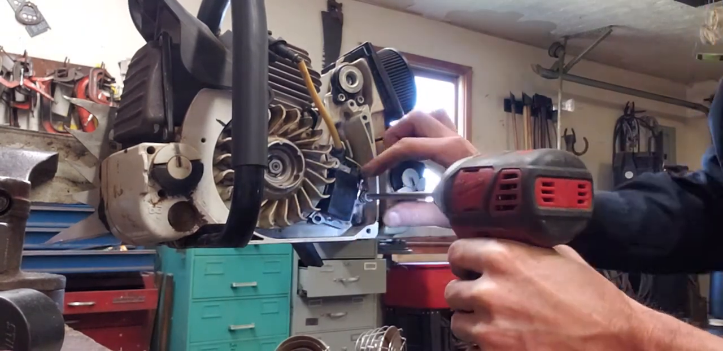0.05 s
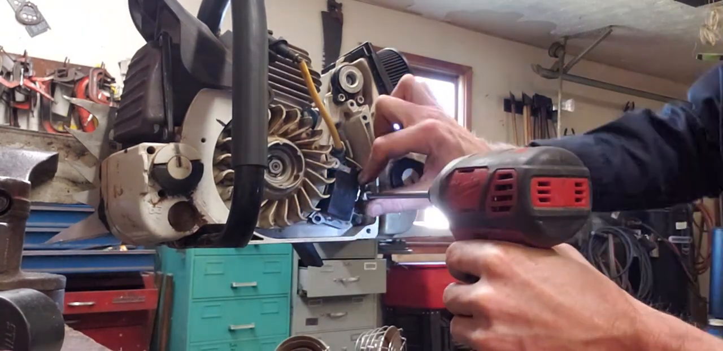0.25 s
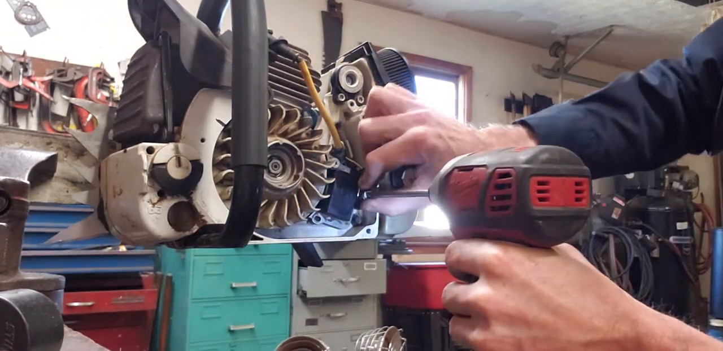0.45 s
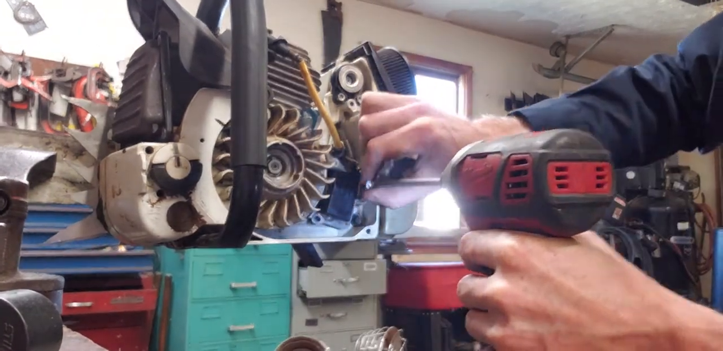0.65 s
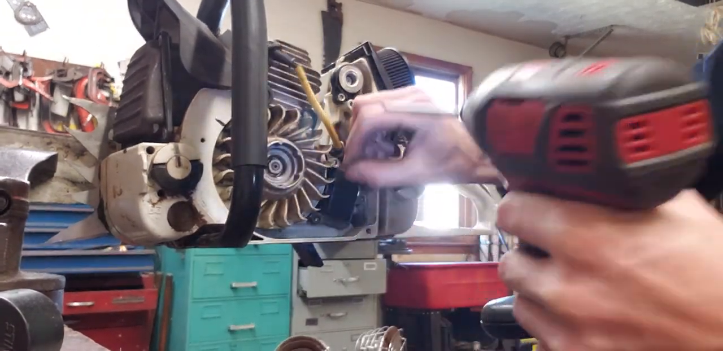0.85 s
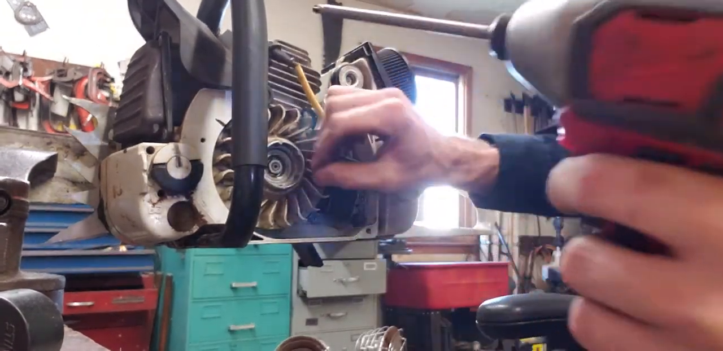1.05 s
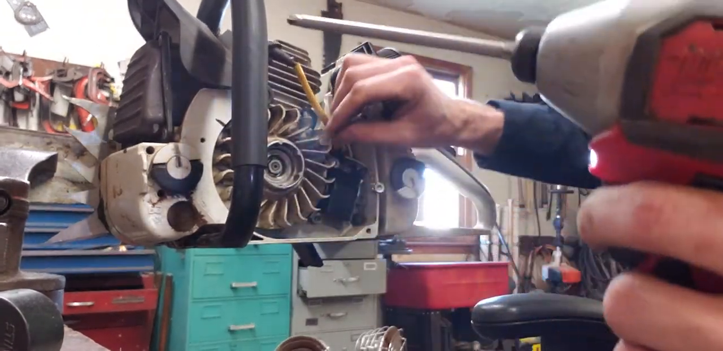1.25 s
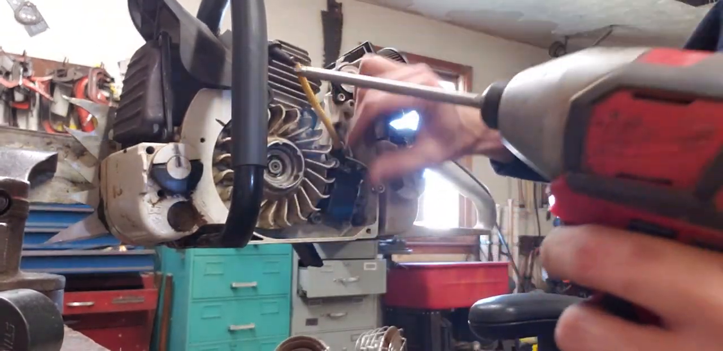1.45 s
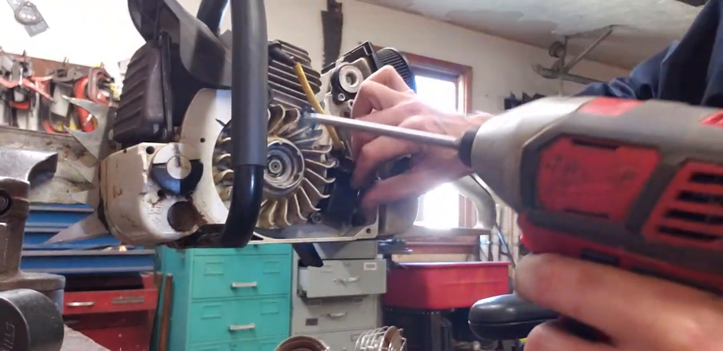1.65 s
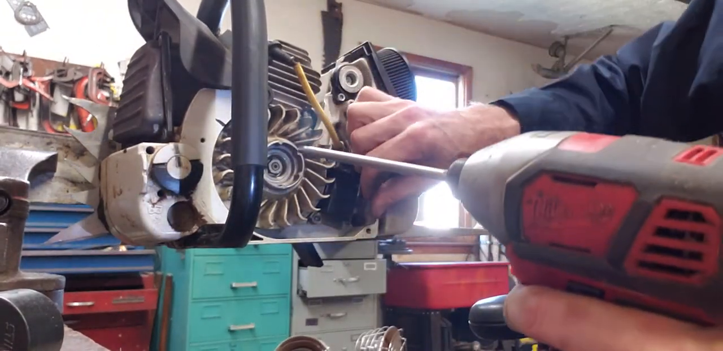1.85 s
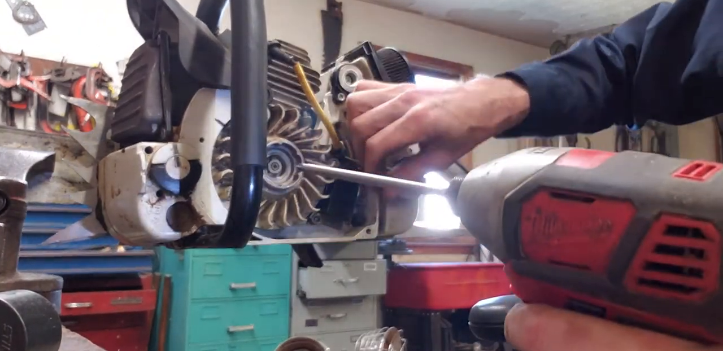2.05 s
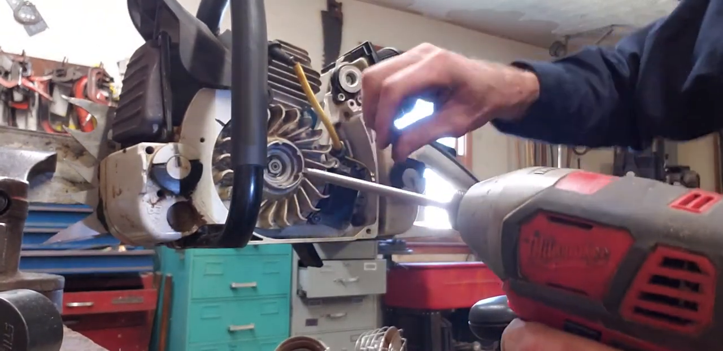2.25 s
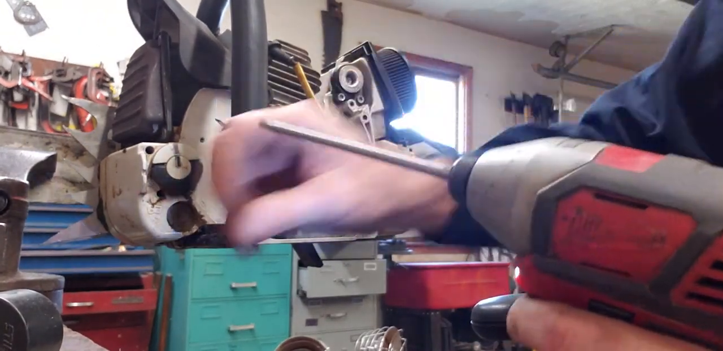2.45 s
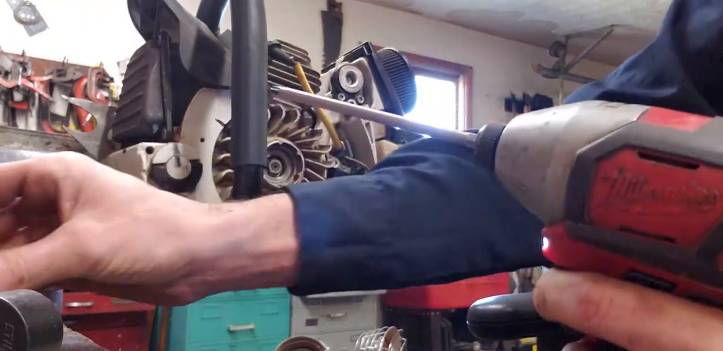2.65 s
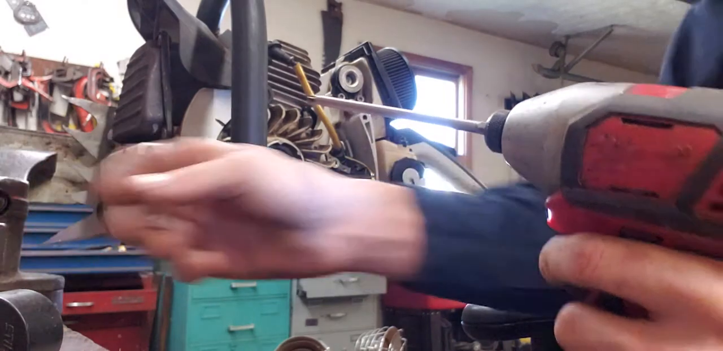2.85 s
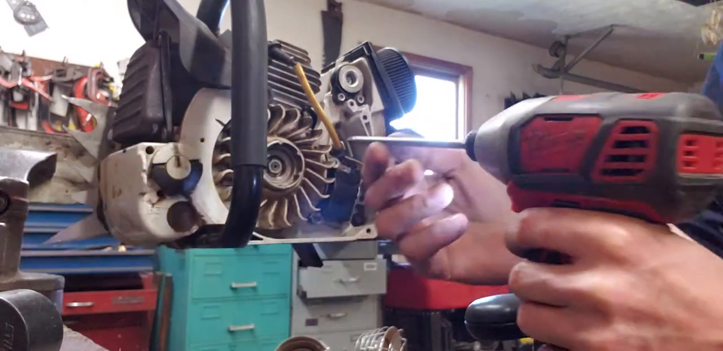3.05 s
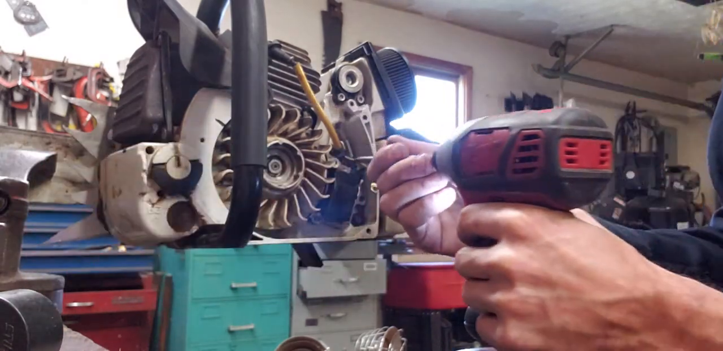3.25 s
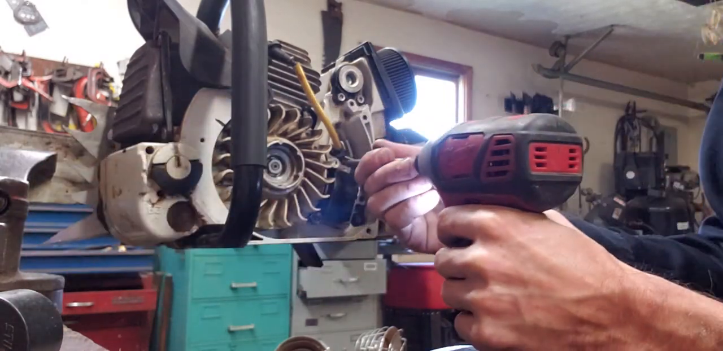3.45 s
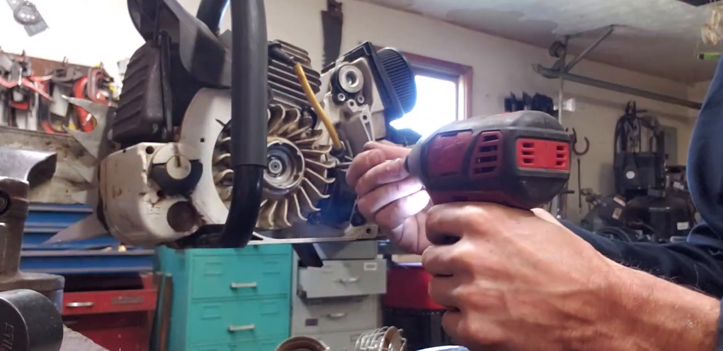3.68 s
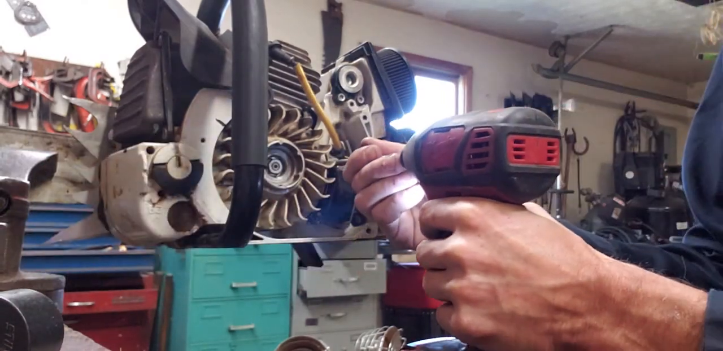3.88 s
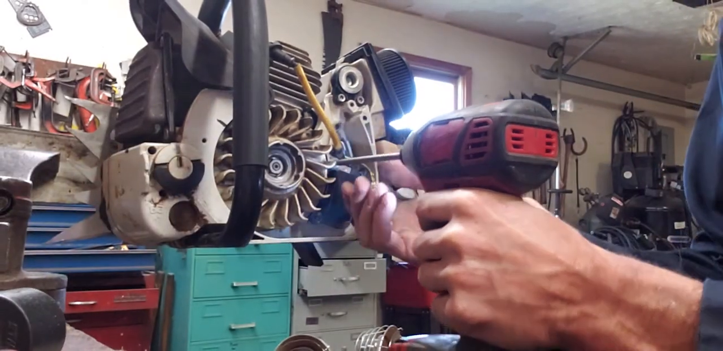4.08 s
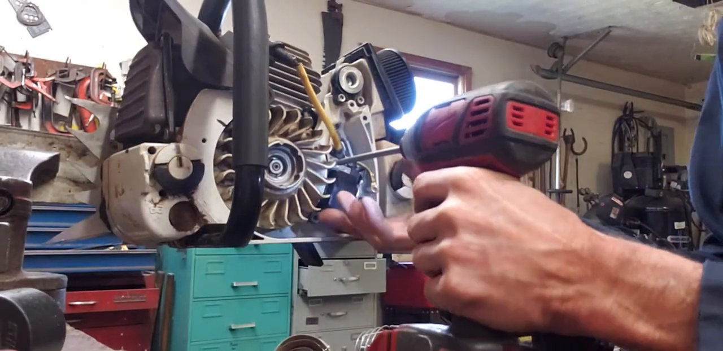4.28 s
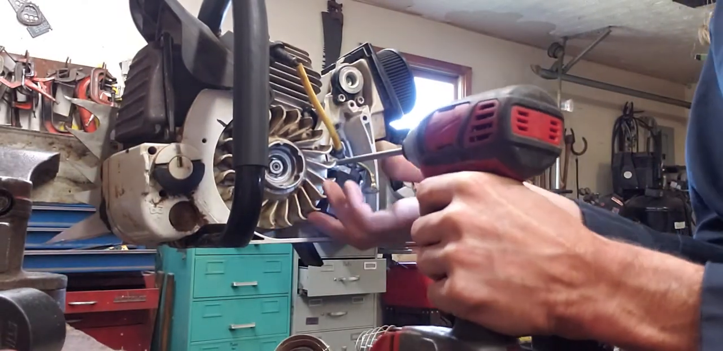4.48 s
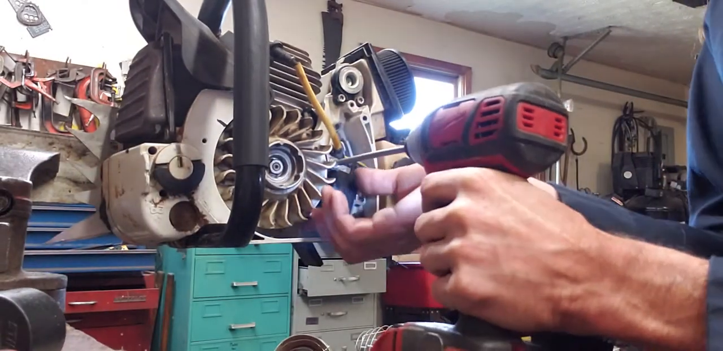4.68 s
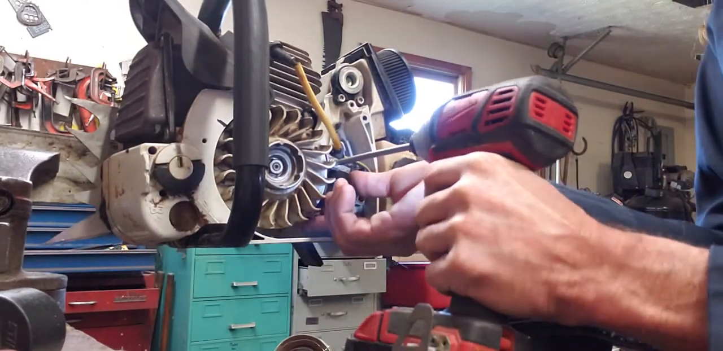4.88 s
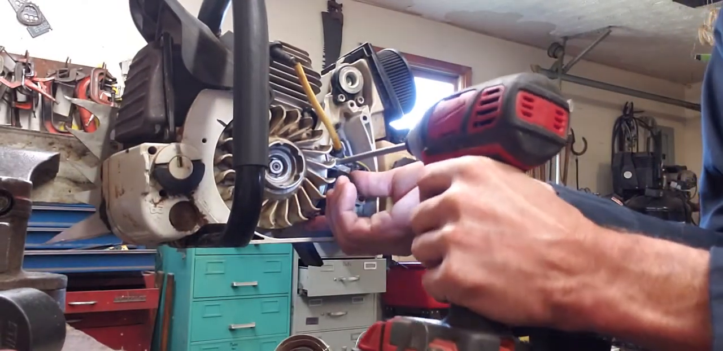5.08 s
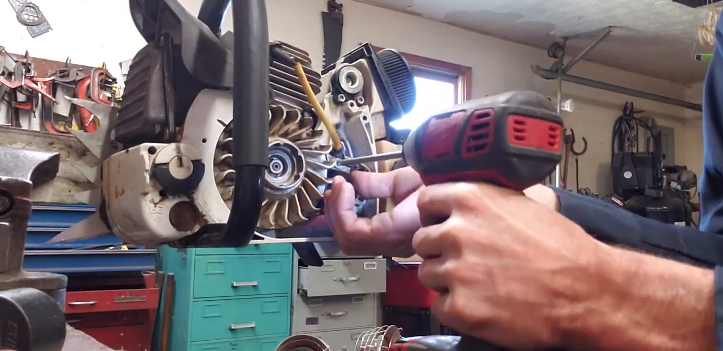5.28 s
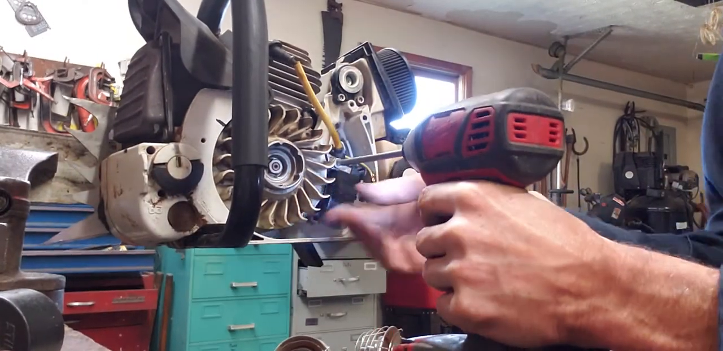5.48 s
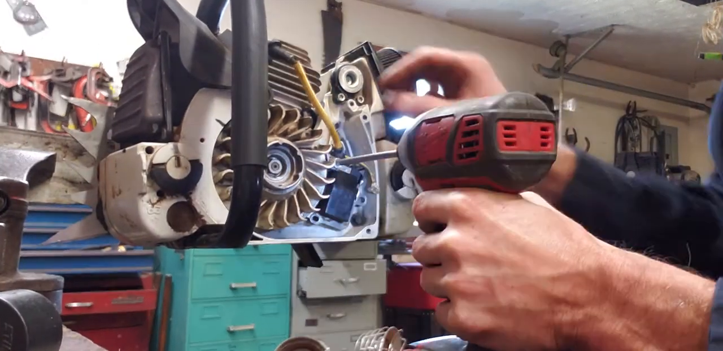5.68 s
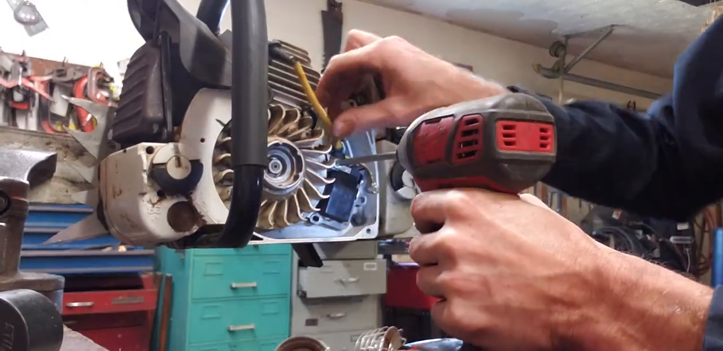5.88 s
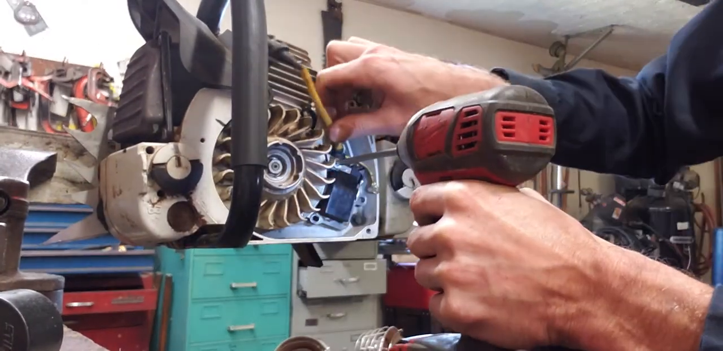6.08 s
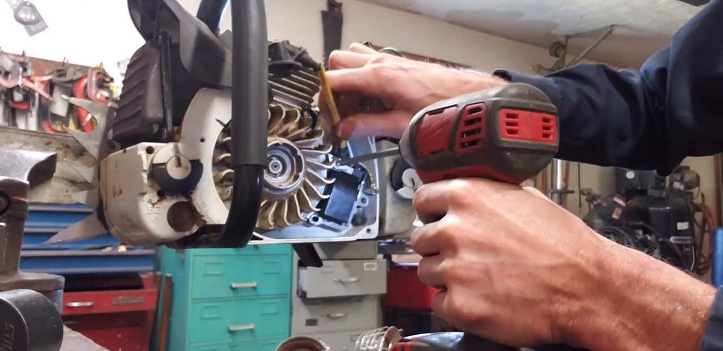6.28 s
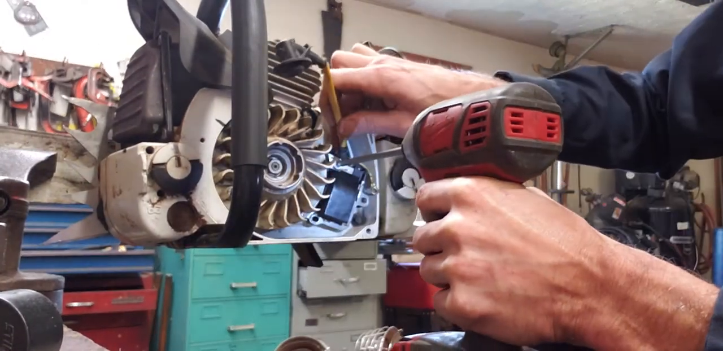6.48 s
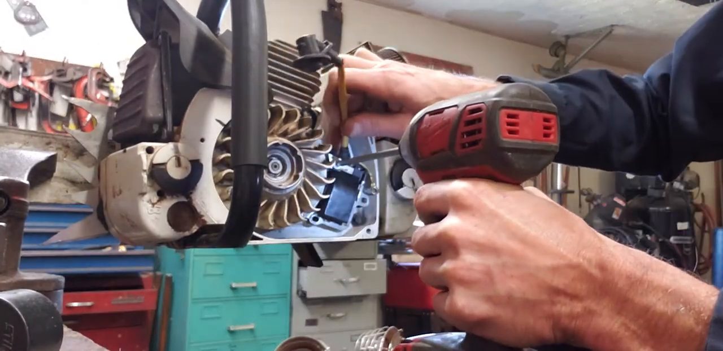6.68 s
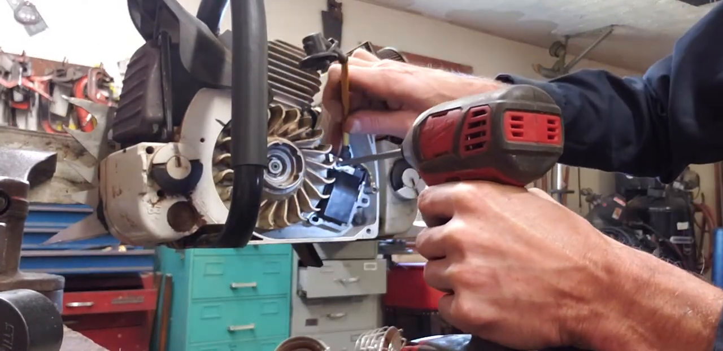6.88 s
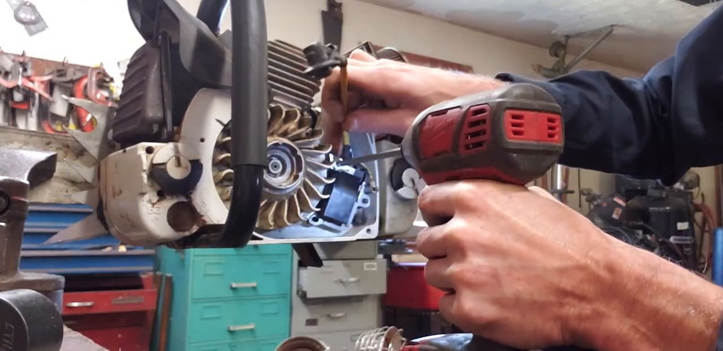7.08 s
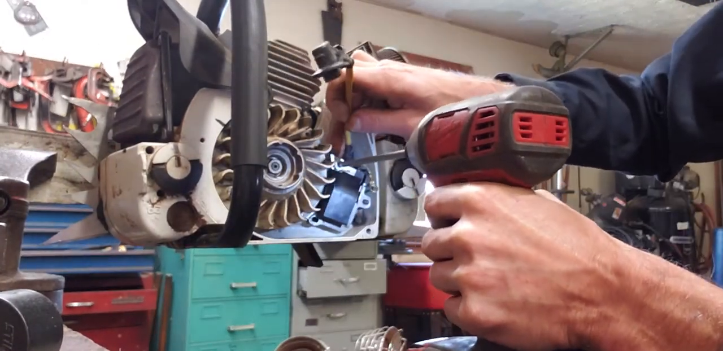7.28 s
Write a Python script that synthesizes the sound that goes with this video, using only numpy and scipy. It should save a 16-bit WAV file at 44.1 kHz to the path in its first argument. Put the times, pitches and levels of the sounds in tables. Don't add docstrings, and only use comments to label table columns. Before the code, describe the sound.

In an echoing workshop, loose screws click on an engine casting, a part drops, and a cordless driver rattles twice, whines down, then turns slowly.

```python
import sys
import numpy as np
from scipy import signal
from scipy.fft import rfft, irfft, next_fast_len
from scipy.io import wavfile
from scipy.ndimage import uniform_filter1d

SR = 44100
rng = np.random.default_rng(int(sys.argv[2]) if len(sys.argv) > 2 else 0)


def convert_level_to_amplitude(level_db):
    exponent = np.asarray(level_db, float) / 20
    return 10 ** exponent


def file_out(sig):
    cols = np.atleast_2d(sig).T
    lim = np.clip(cols, -1, 1)
    pcm = np.round(lim * 32767).astype(np.int16)
    wavfile.write(sys.argv[1], SR, pcm)


N = 323253
T = np.arange(N) / SR
LONG = next_fast_len(N + SR, True)
HZ = np.maximum(np.fft.rfftfreq(LONG, 1 / SR), 1)


def along_hz(table):
    hz, value = np.transpose(table)
    return np.interp(np.log(HZ), np.log(hz), value)


def band(colour, lo_hz, hi_hz):
    edges = np.sqrt((1 + (lo_hz / HZ) ** 8) * (1 + (HZ / hi_hz) ** 8))
    gain = convert_level_to_amplitude(along_hz(colour)) / edges
    return gain / np.sqrt(np.mean(gain ** 2))


def thirds(colour):
    return band(colour, 1000, 6000), band(colour, 20, 1000), band(colour, 6000, 20000)


def shaped(x, gain):
    return irfft(rfft(x, LONG) * gain, LONG)[..., :N]


def causal(gain):
    cepstrum = irfft(np.log(gain + 1e-6), LONG)
    cepstrum[1:LONG // 2] *= 2
    cepstrum[LONG // 2 + 1:] = 0
    return np.exp(rfft(cepstrum))


def curves(tables, off=-140):
    s, *columns = np.transpose(sum(tables, []))
    running = sum((T > tab[0][0] - .003) & (T < tab[-1][0] + .02) for tab in tables) > 0
    fade = uniform_filter1d(1. * running, SR // 200)
    return [off + fade * (np.interp(T, s, c) - off) for c in columns]


def walk(rate):
    k = int(SR / rate)
    held = np.repeat(rng.standard_normal(N // k + 1), k)
    return 2.6 * uniform_filter1d(held, k)[:N]


def hits(events, colour, ring, ring_db, rise_ms, crack, strike=0):
    push = np.zeros((3, N))
    t = T[:SR // 6]
    for s, mid_db, low_db, high_db, t60 in events:
        i = int(s * SR)
        shape = (1 - np.exp(-t * 1000 / rise_ms)) * convert_level_to_amplitude(-60 * t / max(t60, .004))
        burst = rng.standard_normal(len(t)) * shape / shape.max() / 2
        burst *= 1 + crack * np.exp(-t * 1000 / 0.64)
        burst[0] += strike
        push[:, i:i + len(t)] += convert_level_to_amplitude([mid_db, low_db, high_db])[:, None] * burst

    resonance = 0
    for hz, db, t60 in ring:
        resonance = resonance + convert_level_to_amplitude(db) / (1 + 1j * (HZ - hz) * np.pi * 2 * t60 / np.log(1000))
    tint = 1 + convert_level_to_amplitude(ring_db) * resonance / np.abs(resonance).max()
    tint = tint / np.sqrt(np.mean(np.abs(tint) ** 2))
    return sum(shaped(p, causal(g) * tint) for p, g in zip(push, thirds(colour)))


def contacts(table, t60, thud_db=0, edge_db=0):
    return [(s, db, db + thud_db, db + edge_db + sum(edge), t60) for s, db, *edge in table]


def pings(table):
    out, t = np.zeros(N), T[:SR // 4]
    for s, db, hz, t60 in table:
        onset = np.minimum(t * hz * 2, 1)
        tone = convert_level_to_amplitude(db - 60 * t / t60) * onset * np.sin(2 * np.pi * hz * t)
        out[int(s * SR):][:len(t)] += tone
    return out


# (time [s], peak level [dB], thud below 1 kHz [rel dB], edge above 6 kHz [rel dB])
BLOWS = [(4.1533, -13, -15.5, -3), (4.158, -12.5, -9.5, -3.5), (4.164, -18.5, -7.5, -8),
         (4.172, -21.5, 5, -6.5), (4.1968, -15.5, -4, -0.5), (4.199, -10, -5.5, -1.5),
         (4.2079, -15, 5, 2.5), (4.2126, -15, 2.5, 1.5), (4.222, -32.5, 6, -3.5), (4.2304, -23, 5.5, -7),
         (4.2407, -11.5, -15.5, 1), (4.2488, -15.5, -17.5, 8), (4.258, -14, -13, 3),
         (4.269, -25.5, -0.5, -1), (4.2904, -18, -2.5, -0.5), (4.3005, -19, -6.5, 4),
         (4.5516, -23.5, -13, -12), (4.562, -9, -16, 2.5), (4.5737, -11.5, -7.5, 4), (4.5812, -19, -10, 6),
         (4.6027, -16, -6.5, -6), (4.615, -13.5, -9.5, 4.5), (4.6245, -19.5, -18.5, 3),
         (4.634, -12, -7.5, 2), (4.645, -22, -6.5, 6), (4.658, -20, -17.5, 6), (4.666, -17.5, -16, 4),
         (4.675, -16.5, -8.5, 6.5), (4.689, -15, -17, 0.5), (4.697, -24.5, -6, 14), (4.7048, -16.5, -13, 7),
         (4.7125, -14.5, -3.5, 3), (5.6492, -35.5, -14.5, 11.5)]
# (frequency [Hz], level [dB])
HAMMER_COLOUR = [(40, -17.5), (100, -3), (201, -3.5), (243, -1.5), (288, -19), (341, -2), (520, -9.5),
                 (713, 1), (959, -10.5), (1490, -7), (1730, -9), (3130, -7.5), (8100, -27), (9200, -19),
                 (15600, -23)]
# (frequency [Hz], level [dB], t60 [s])
HAMMER_RING = [(240, -2, 0.08), (344, -5, 0.08), (9420, -11, 0.006), (14930, -8, 0.01)]


def hammer():
    t60 = 0.018
    rows = [(s, db, db + thud, db + edge, t60) for s, db, thud, edge in BLOWS]
    return hits(rows, HAMMER_COLOUR, HAMMER_RING, ring_db=-1.5, rise_ms=1.4, crack=0.67, strike=1.4)


BAR_ORDERS_DB = [0, -7, -7, -10, -9, -10, -10]
MESH_ORDERS_DB = [1, 0, -6, -5, -1, -1, -1, -2, -2, -2, -4]
# (frequency [Hz], level [dB])
WHINE_COLOUR = [(1500, -9), (2250, -3), (2650, -5), (2900, -3), (3300, -1), (3600, -1), (4600, -12),
                (6500, -6), (7200, -2), (8000, -10), (10800, -2), (12500, -4), (15000, -8)]
GEAR_COLOUR = [(400, -15), (560, -8), (760, -9), (1000, -10), (1500, -1), (2100, 4), (2350, 2), (2550, -10),
               (3300, -12), (3800, -6), (4200, 8), (4700, -8), (5200, -9), (5800, 2), (6300, -4), (7000, 3),
               (8000, -6), (11500, 5), (12300, 3), (13000, -4), (15000, -8)]
MESH_PER_BAR, SHAFT_PER_BAR, PLANET_PER_BAR = .729, .066, .041


def whine(spin, tilt_db, bar_db, mesh_db):
    bar_hz, whine_db = curves([spin])
    turn = 2 * np.pi * np.cumsum(np.maximum(bar_hz, 0) * (1 + 0.001 * walk(60))) / SR
    throb = 1 + .35 * np.cos(PLANET_PER_BAR * turn)
    bars = (1, bar_db, BAR_ORDERS_DB, WHINE_COLOUR)
    mesh = (MESH_PER_BAR, mesh_db, MESH_ORDERS_DB, GEAR_COLOUR)
    out = 0
    for ratio, level_db, orders, colour in (bars, mesh):
        body_hz, body_gain_db = np.transpose(colour)
        for k, order_db in enumerate(orders, 1):
            audible = k * ratio * bar_hz < 15800
            tone_hz = k * ratio * np.maximum(bar_hz, 1)
            body_db = np.interp(np.log(tone_hz), np.log(body_hz), body_gain_db)
            flicker_db = 1.2 * walk(20)
            tone_db = whine_db + level_db + order_db + tilt_db * np.log2(k) + body_db + flicker_db
            out = out + audible * convert_level_to_amplitude(tone_db) * np.sin(k * ratio * turn + k * k)
    return np.sqrt(2) * throb * out, SHAFT_PER_BAR * turn, bar_hz


# (time [s], commutator frequency [Hz], whine level [dB])
FAST_SPIN = [(4.9, 1300, -66), (5.0, 2860, -47), (5.05, 3320, -44), (5.09, 3520, -43), (5.22, 3612, -42),
             (5.31, 3300, -41), (5.43, 2754, -45), (5.6, 1970, -49), (5.65, 1730, -56)]
SLOW_SPIN = [(6.44, 500, -64), (6.49, 766, -40), (6.53, 920, -41), (6.575, 1045, -42), (6.62, 1048, -42),
             (6.71, 690, -41), (6.78, 450, -47)]
# (time [s], brush hiss level [dB])
LOAD = [
    [(4.097, -53.5), (4.15, -37), (4.2, -30.5), (4.266, -42.5), (4.31, -36.5), (4.34, -61)],
    [(4.525, -67.5), (4.555, -41), (4.59, -30.5), (4.65, -29.5), (4.72, -30), (4.76, -72)],
    [(4.87, -53), (4.968, -38), (5.06, -38), (5.25, -46), (5.5, -48), (5.645, -50), (5.71, -93)],
    [(6.385, -99), (6.445, -54), (6.5, -48), (6.6, -46.5), (6.75, -53), (6.81, -63), (6.9, -91.5)],
]
# (frequency [Hz], level [dB])
MOTOR_COLOUR = [(29, -49), (50, -2.5), (144, -9), (183, -12.5), (227, -4), (435, -12.5), (566, -7.5),
                (1630, -5.5), (1840, 0), (3190, -3), (3780, -5), (4160, -7), (7960, -12), (10400, -4),
                (13500, 2.5), (15600, -8)]
# (time [s], peak level [dB], frequency [Hz], t60 [s])
RATTLE = [(5.13, -44.5, 230, 0.31), (5.36, -44, 227, 0.27), (5.42, -46, 144.6, 0.39),
          (5.52, -47.5, 136.6, .3), (5.54, -47.5, 228.8, 0.28), (5.32, -36, 760, 0.037),
          (5.403, -38, 674, 0.029), (5.45, -36, 804, 0.02), (5.455, -43, 684, 0.024),
          (5.498, -34, 820, 0.024), (5.551, -35, 790, 0.024), (5.614, -48, 610, 0.064),
          (5.913, -66.5, 1239, 0.043), (5.925, -70, 1038, 0.16), (6.255, -58, 1253, 0.047)]


def motor():
    fast, fast_shaft, fast_hz = whine(FAST_SPIN, tilt_db=0, bar_db=-3, mesh_db=-8)
    slow, slow_shaft, slow_hz = whine(SLOW_SPIN, tilt_db=-8, bar_db=-40, mesh_db=-2)
    load_db, = curves(LOAD)
    octaves = np.log2(np.maximum(np.maximum(fast_hz, slow_hz), 700) / 1000)

    growl_db = -56 + 0.081 * (load_db + 40.0) + 2.5 * octaves + 10.5 * (T < 4.8)
    growl_db = np.minimum(growl_db, load_db + 11.5)
    fizz_db = -45.5 + 0.77 * (load_db + 44.5) + 4.5 * uniform_filter1d(octaves, SR // 50)
    fizz_db = np.minimum(fizz_db, load_db + 17.5)

    beat = 1 + 0.028 * np.cos(fast_shaft + slow_shaft)
    grit = beat * convert_level_to_amplitude(0.72 * walk(150)) * rng.standard_normal(N)
    levels_db = (load_db, growl_db, fizz_db)
    hiss = sum(convert_level_to_amplitude(db) * shaped(grit, g) for db, g in zip(levels_db, thirds(MOTOR_COLOUR)))
    return hiss + pings(RATTLE), fast + slow


# (time [s], level [dB])
WHISTLE = [
    [(4.06, -66), (4.15, -61)],
    [(4.495, -77), (4.55, -67)],
    [(6.358, -78), (6.6, -76), (6.9, -82), (7.0, -77), (7.14, -77)],
]
# (time [s], level [rel dB])
WHISTLE_OCTAVE_DB = [(4.2, -6), (4.5, 3), (6.3, 7)]


def whistle():
    lower_db, = curves(WHISTLE)
    upper_db = lower_db + np.interp(T, *np.transpose(WHISTLE_OCTAVE_DB))
    chop_hz = 7702 + 4.2 * walk(25)
    chop = 2 * np.pi * np.cumsum(chop_hz) / SR
    lower = convert_level_to_amplitude(lower_db + walk(26)) * np.sin(chop)
    upper = convert_level_to_amplitude(upper_db + walk(16)) * np.sin(2 * chop)
    return np.sqrt(2) * (lower + upper)


# (time [s], middle level [dB], bass level [dB], treble
# level [dB], t60 [s])
SEATING = [(0.7432, -69, -56, -82, 0.09), (0.9437, -36, -42.5, -83, 0.13), (1.716, -74, -52, -80, 0.2),
           (2.3955, -76, -55.5, -82, 0.049), (3.772, -50.5, -48.5, -94, 0.079),
           (3.7842, -45, -44, -77, 0.075), (3.8397, -42, -38.5, -55, 0.08), (3.913, -37, -23.5, -33, 0.037),
           (3.9254, -61, -24.5, -45, 0.0091), (4.0975, -50, -54.5, -57, 0.024),
           (5.6855, -54.5, -72, -69.5, 0.04), (6.2303, -70, -63.5, -84.5, 0.15),
           (6.2564, -63.5, -60.5, -90, 0.064), (6.2744, -69.5, -63, -97, 0.055),
           (7.1364, -75.5, -79.5, -67, 0.038)]
# (frequency [Hz], level [dB])
SEAT_COLOUR = [(180, -43), (300, -11), (354, -4), (519, -13), (842, -8.5), (1560, -7.5), (1870, -12.5),
               (5340, -31), (6850, -23), (9240, -48), (16000, -54.5)]
# (frequency [Hz], level [dB], t60 [s])
SEAT_RING = [(228.9, -1.5, 0.27), (763, -3, 0.45), (2570, -20.5, 0.057), (3235, -28, 0.17),
             (4250, -11, 0.02), (7500, -21, 0.12)]


def seating():
    return hits(SEATING, SEAT_COLOUR, SEAT_RING, ring_db=1.0, rise_ms=0.36, crack=0.75)


# (time [s], middle level [dB], bass level [dB], treble level [dB], t60 [s])
EARLIER_TICK = [(0, -59, -90, -96, .4)]
# (time [s], peak level [dB])
FUMBLE = [(0.003, -64), (0.118, -76.5), (0.1416, -60.5), (0.163, -69), (0.231, -71), (0.2445, -63.5),
          (0.3107, -71), (0.33, -61.5), (0.3458, -55), (0.3689, -47.5), (0.415, -49.5)]
# (time [s], peak level [dB], edge above 6 kHz [rel dB])
SCREWS = [(0.568, -73.5, -10), (0.7432, -54, -4), (0.9238, -61.5, 15), (0.9437, -20, 2.5),
          (0.9802, -33, -23.5), (1.0299, -26.5, 0.5), (1.1521, -31, -4.5), (1.198, -44, -22.5),
          (1.3085, -41, -20.5), (1.644, -55, -10), (1.696, -37, 0.5), (1.71, -34, -6), (1.716, -28, -4),
          (1.7365, -27.5, -3.5), (1.9242, -34.5, -29.5), (1.9821, -48.5, 11), (1.9918, -25, -6),
          (2.0571, -31.5, -11), (2.0792, -41, 4.5), (2.0962, -33, 2), (2.112, -25, -2.5)]
# (frequency [Hz], level [dB])
SCREW_COLOUR = [(180, -52), (300, -19), (900, -25), (1080, -18.5), (1410, -12), (1640, -9.5), (2210, -1.5),
                (3350, 3), (5160, -8), (6740, -9.5), (9000, -5.5), (13100, -4.5), (16000, -16)]
# (frequency [Hz], level [dB], t60 [s])
SCREW_RING = [(1640, -5.5, 0.028), (4300, -12, 0.021), (1860, -6, 0.027), (3260, -12, 0.17),
              (4074, -7.5, 0.049), (6860, -2.5, 0.0076), (9200, -10.5, 0.054), (2664, -3, 0.1),
              (1254, -11.5, 0.093), (12800, -10.5, 0.093), (13300, -8.5, 0.05)]
# (time [s], peak level [dB], frequency
# [Hz], t60 [s])
CUP = [(0.002, -65, 2730, 0.19), (0.002, -72, 3250, .25), (0.163, -62, 2920, .04),
       (0.245, -59, 2800, 0.047), (0.346, -56, 3000, .03), (0.369, -48, 3110, 0.042),
       (0.415, -48.5, 2960, 0.04), (1.0299, -30, 2620, .03), (1.71, -31.5, 1560, .025),
       (2.112, -34.5, 1610, .025), (4.604, -16, 753, .02), (0.002, -69, 1520, .3),
       (0.142, -57, 1380, 0.046), (0.346, -54, 1250, 0.066), (0.369, -54, 1250, 0.054),
       (0.369, -59, 1860, 0.043), (0.415, -58, 1265, 0.055), (0.415, -47, 1910, 0.026),
       (0.568, -68.5, 1250, 0.036), (4.562, -33.5, 247.4, 0.072), (4.615, -29, 228, 0.058),
       (4.675, -34, 257, 0.074), (0.7432, -58, 1533, 0.038), (0.9437, -20.5, 1790, 0.016),
       (0.9437, -37.5, 1254, 0.031), (1.716, -38.5, 1604, 0.049), (1.9918, -46, 1630, 0.047),
       (2.112, -41.5, 4086, 0.084), (4.2085, -17.5, 869, .018), (3.913, -30.5, 826, 0.063),
       (3.913, -34.5, 230.5, 0.19), (4.2, -22, 256.2, .12), (4.222, -25.5, 153.6, 0.078),
       (6.256, -63, 2138, 0.052), (6.84, -75, 3410, 0.45)]


def screws():
    fumble = contacts(FUMBLE, t60=0.06, thud_db=-2.5, edge_db=7)
    bounces = contacts(SCREWS, t60=0.049, thud_db=-37)
    ticks = hits(EARLIER_TICK + fumble + bounces, SCREW_COLOUR, SCREW_RING,
                 ring_db=9, rise_ms=0.064, crack=0.5, strike=2.9)
    return ticks + pings(CUP)


# (time [s], middle level [dB], bass level [dB], treble level [dB], t60 [s])
DROPS = [
    (2.7772, -16.5, -45, -36, 0.0088),
    (2.7818, -10, -18.5, -35.5, 0.013),
    (2.7899, -51, -29, -27.5, 0.014),
    (2.8679, -24, -20, -66, 0.0214),
    (2.9064, -31, -34.5, -49, 0.034),
    (2.9744, -49, -47, -66, 0.032),
]
# (frequency [Hz], level [dB])
DROP_COLOUR = [(120, -38.5), (200, -23), (700, -12), (1000, -16), (1600, -14.5), (2200, -13), (3830, -23),
               (5200, -34), (6280, -47), (13600, -22.5), (16000, -52)]
# (frequency [Hz], level [dB], t60 [s])
DROP_RING = [(2100, -3, 0.01), (476, -9, 0.0097), (702, -11, 0.03), (1196, -10, 0.02), (1560, -2.5, 0.02),
             (3157, -8, 0.008)]


def dropped_part():
    return hits(DROPS, DROP_COLOUR, DROP_RING, ring_db=0, rise_ms=0.55, crack=0.94, strike=1.2)


# (time [s], peak level [dB], frequency
# [Hz], t60 [s])
PART_TONES = [(2.7817, -7, 1590, 0.032), (2.7817, -4.5, 2078, .022), (2.7817, -15, 3370, .014),
              (2.7817, -25.5, 1210, 0.091), (2.7817, -22, 688, 0.057), (2.7817, -28, 447, 0.051),
              (2.8679, -10, 1630, 0.016), (2.868, -12, 2050, .014), (2.868, -19, 1114, 0.048),
              (2.868, -21.5, 700, 0.033), (2.868, -16, 420, 0.016), (2.868, -29.5, 264, 0.044),
              (2.868, -47, 3260, .012), (2.9064, -40, 490, 0.031), (2.9064, -33, 1140, 0.026)]


def part_tones():
    return pings(PART_TONES)


# (time [s], level [dB])
RUMBLE = [(0, -58), (0.521, -62), (1.0, -59.5), (2.001, -56.5), (2.429, -48.5), (2.8, -48), (3.399, -52),
          (3.62, -50.5), (3.85, -49), (4.15, -44.5), (4.24, -32.5), (4.4, -55), (4.7, -47), (5.0, -72.5),
          (5.5, -50.5), (5.76, -66), (6.4, -65.5), (7.33, -60)]
# (middle time [s], half length [s], rustle level [dB], swish level [dB])
STROKES = [(0.038, 0.14, -73, -86), (0.298, 0.13, -88, -93), (0.761, 0.077, -82, -73.5),
           (1.126, 0.2, -79.5, -78), (1.985, 0.24, -81.5, -88.5), (2.43, 0.033, -78.5, -90),
           (2.708, 0.55, -88.5, -81.5), (3.005, 0.11, -77.5, -77.5), (3.233, 0.1, -84, -72.5),
           (3.802, 0.59, -93.5, -84), (4.134, 0.064, -87, -64), (6.363, 0.078, -100, -88.5)]
# (frequency [Hz], level [dB])
AIR_COLOUR = [(12, -48), (20, -19), (43, -7.5), (65, -1), (187, -14), (234, -17.5), (357, -23),
              (542, -38.5), (590, -31), (642, -42.5), (949, -46.5), (1030, -58), (2750, -61.5),
              (5680, -57.5), (16000, -44.5)]
RUSTLE_COLOUR = [(410, -39.5), (700, 1), (967, -26), (1210, -12), (1600, -5.5), (1820, -11.5), (2700, -8.5),
                 (5010, -19.5), (6000, -18), (7800, -43.5), (13200, -120)]


def air():
    rustle_gain, hiss_gain = convert_level_to_amplitude(-100), convert_level_to_amplitude(-88.5)
    for mid_s, half_s, rustle_db, swish_db in STROKES:
        stroke = np.exp(-((T - mid_s) / half_s) ** 2)
        rustle_gain = rustle_gain + convert_level_to_amplitude(rustle_db) * stroke
        hiss_gain = hiss_gain + convert_level_to_amplitude(swish_db) * stroke

    mid, side = rng.standard_normal((2, N))
    pair = np.array([mid + side, mid - side])
    near_alike = np.array([mid + .25 * side, mid - .25 * side])
    rumble_db = np.interp(T, *np.transpose(RUMBLE)) + 1.8 * walk(9)
    rumble = convert_level_to_amplitude(rumble_db) * shaped(near_alike, band(AIR_COLOUR, 10, 900))
    rustle = shaped(pair, band(RUSTLE_COLOUR, 880, 4300)) * convert_level_to_amplitude(walk(61))
    hiss = shaped(pair, band(AIR_COLOUR, 5300, 30000))
    brush = convert_level_to_amplitude(-76) * np.exp(-((T - 3.24) / 0.057) ** 2)
    sleeve = brush * shaped(pair, band(AIR_COLOUR, 5000, 7000))
    return rumble + convert_level_to_amplitude(3.0) * rustle_gain * rustle + hiss_gain * hiss + sleeve


# (frequency [Hz], t60 [s])
ROOM_T60 = [(100, 0.65), (1000, 0.37), (4000, 0.5), (15000, 0.3)]


def room(dry, wet_db, delay_s):
    noise, tail, t = rng.standard_normal((2, SR)), 0, T[:SR]
    table_hz, table_t60 = np.transpose(ROOM_T60)
    for hz in 125 * 2 ** np.arange(8):
        t60 = np.interp(np.log(hz), np.log(table_hz), table_t60)
        octave = shaped(noise, np.exp(-2 * np.log2(HZ / hz) ** 2))[:, :SR]
        tail = tail + octave * convert_level_to_amplitude(-60 * t / t60)
    tail = tail * np.clip(t / delay_s, 0, 1) ** 2
    return convert_level_to_amplitude(wet_db) * shaped(dry, rfft(tail, LONG)) / np.sqrt(np.sum(tail ** 2) / 2)


def ports(sound, pan_db, lag_ms, scatter_db=-4, scatter_ms=2.5, corner_hz=1500, sway_hz=0):
    t = T[:SR // 50]
    scatter = rng.standard_normal((2, 2, len(t))) * np.exp(-t * 1000 / scatter_ms)
    scatter = rfft(scatter / np.sqrt(np.sum(scatter ** 2, axis=2, keepdims=True)), LONG)
    share = convert_level_to_amplitude(scatter_db) * HZ / np.sqrt(HZ ** 2 + corner_hz ** 2)
    lags_ms = lag_ms * np.array([[1], [-1]]) + abs(lag_ms)
    direct = np.exp(-1j * np.pi * HZ * lags_ms / 1000)
    direct = convert_level_to_amplitude([[pan_db / 2], [-pan_db / 2]]) * direct / np.sqrt(1 + share ** 2)
    sway = 2 * np.pi * sway_hz * T
    one, other = shaped(sound, direct * share * scatter)
    return shaped(sound, direct) + np.cos(sway) * one + np.sin(sway) * other


def scene():
    hiss, song = motor()
    tool = hammer() + hiss
    seat, ticks = seating(), screws()
    drop, tones = dropped_part(), part_tones()

    near = ports(tool, pan_db=0.74, lag_ms=-.182, scatter_db=4.5, sway_hz=3.5, scatter_ms=1.9)
    near = near + ports(song, pan_db=0, lag_ms=-.03, scatter_db=-12)
    near = near + ports(seat, pan_db=5.5, lag_ms=0.079)
    near = near + ports(ticks, pan_db=1.9, lag_ms=-0.064)
    near = near + ports(drop + tones, pan_db=-4, lag_ms=.2, scatter_db=-5)

    to_room = 0.67 * ticks + 0.87 * drop + .08 * tones + 1.1 * seat + 0.81 * tool + .15 * song
    return near + room(to_room, wet_db=-7, delay_s=0.0027) + whistle() + air()


def band_limit(x):
    return signal.sosfilt(signal.butter(12, 16970, fs=SR, output="sos"), x)


def record(dry):
    port_db = 7 * np.exp(-((HZ - 15100) / 1600) ** 2)
    port = shaped(dry, convert_level_to_amplitude(port_db))
    rounded = 1.3 * np.tanh(port / 1.3)
    top_cut = signal.ellip(6, .3, 30, 15850, fs=SR, output="sos")
    mix = signal.sosfilt(top_cut, rounded)
    return band_limit(mix)


dry = scene()
out = record(dry)
file_out(out)
```